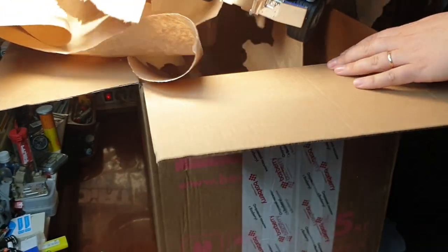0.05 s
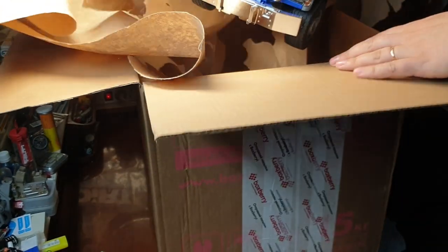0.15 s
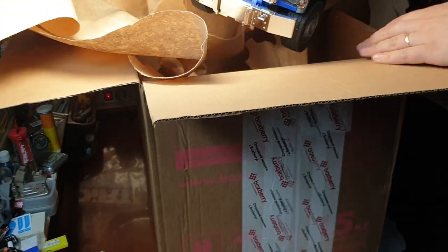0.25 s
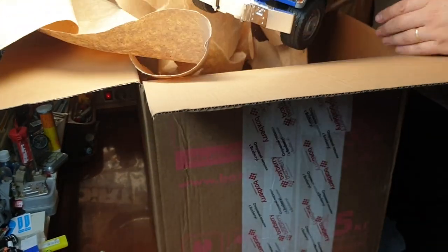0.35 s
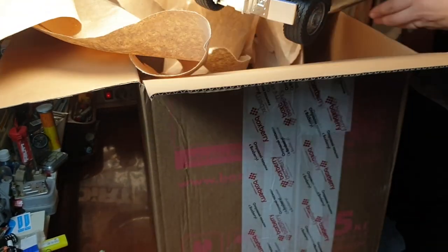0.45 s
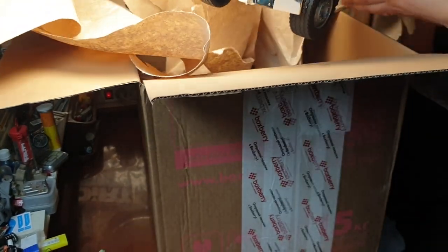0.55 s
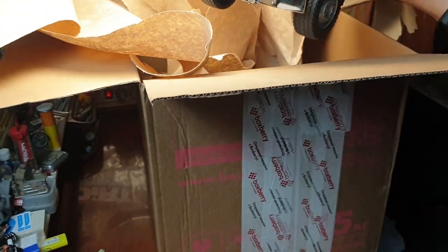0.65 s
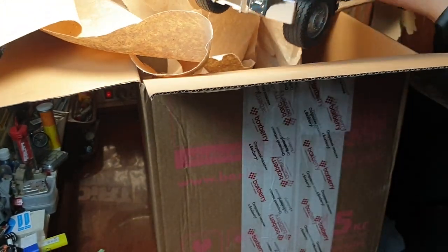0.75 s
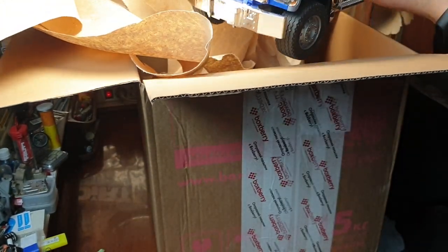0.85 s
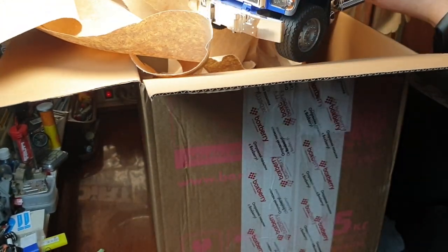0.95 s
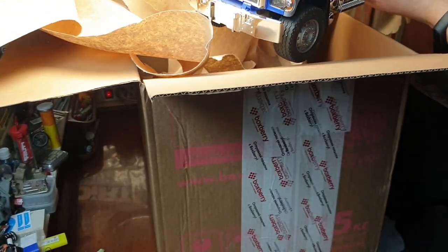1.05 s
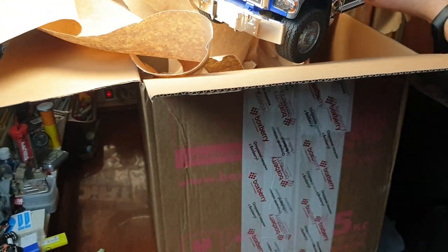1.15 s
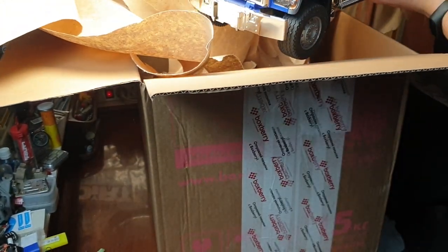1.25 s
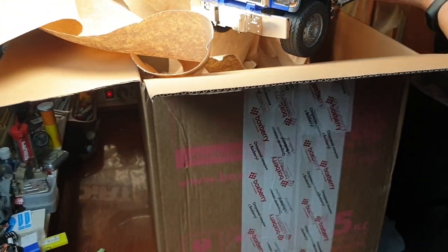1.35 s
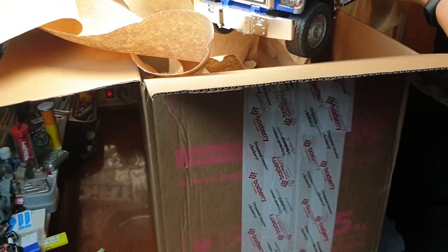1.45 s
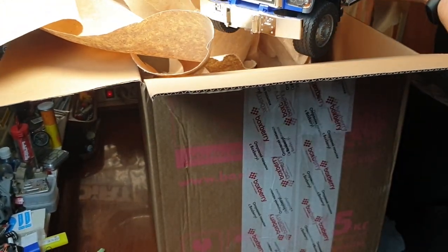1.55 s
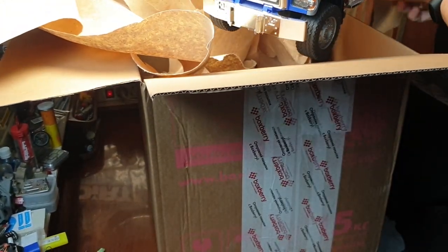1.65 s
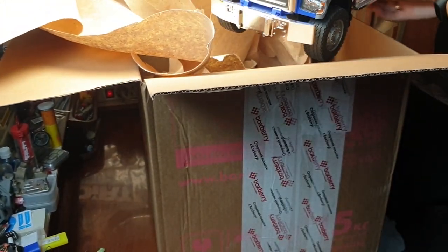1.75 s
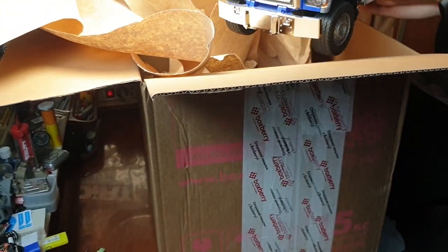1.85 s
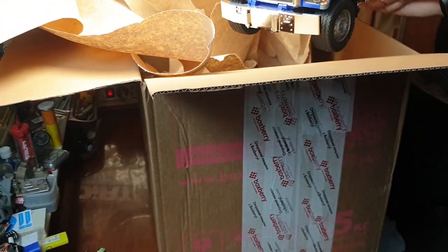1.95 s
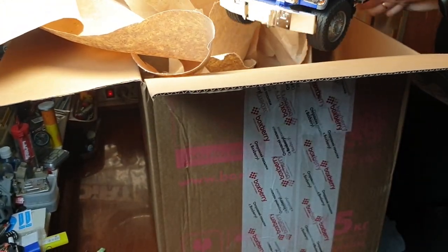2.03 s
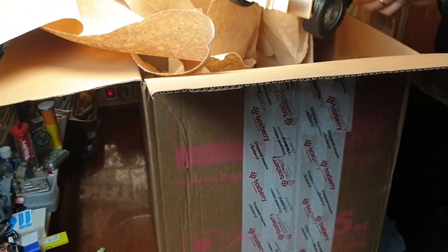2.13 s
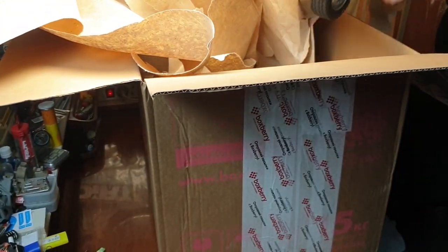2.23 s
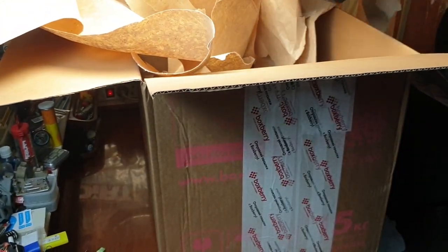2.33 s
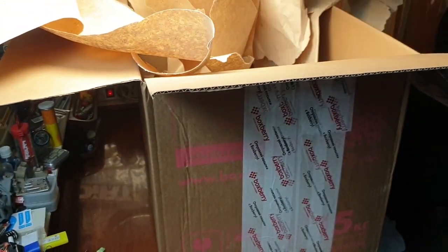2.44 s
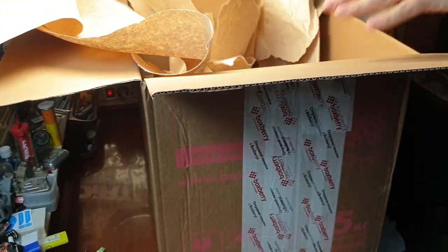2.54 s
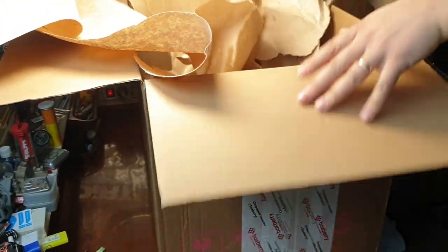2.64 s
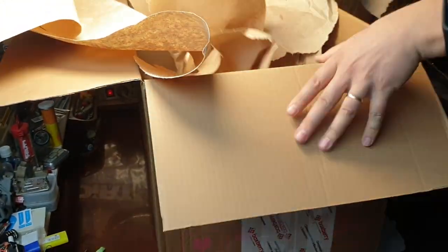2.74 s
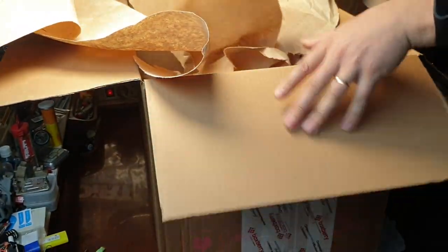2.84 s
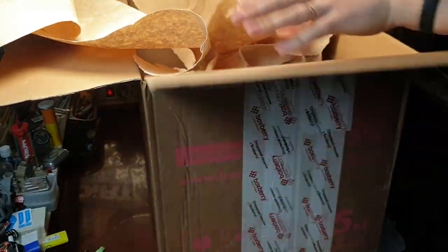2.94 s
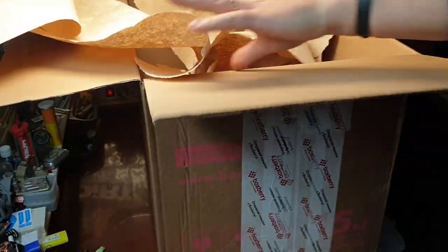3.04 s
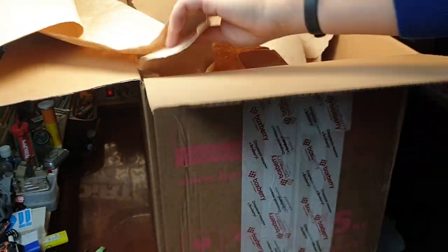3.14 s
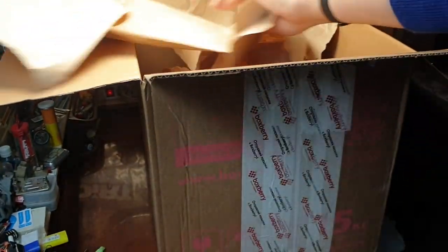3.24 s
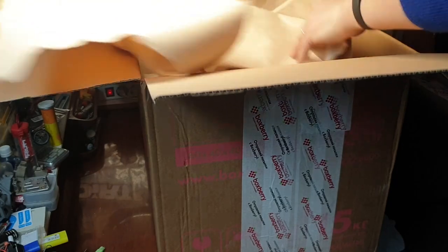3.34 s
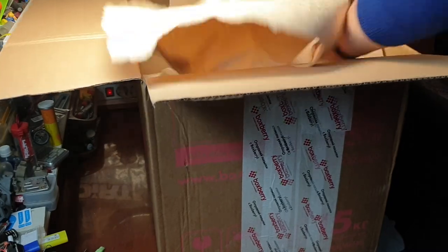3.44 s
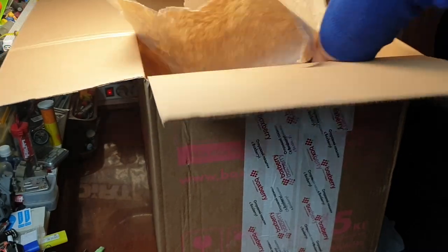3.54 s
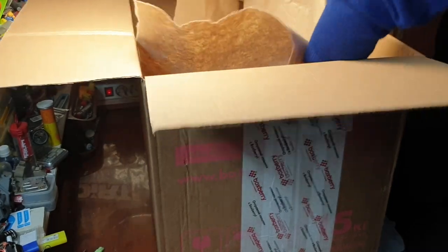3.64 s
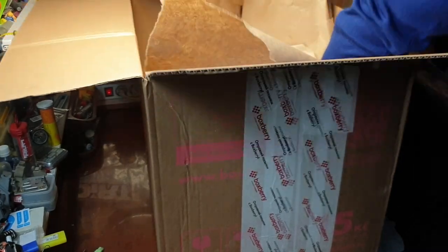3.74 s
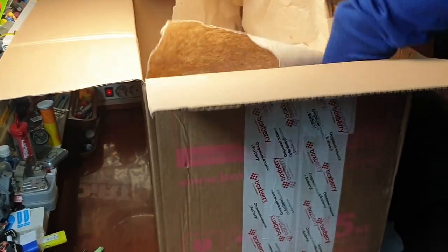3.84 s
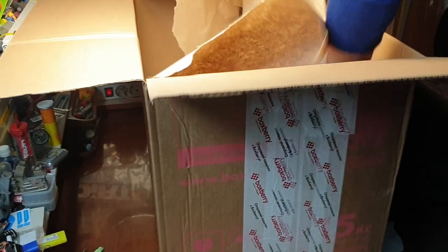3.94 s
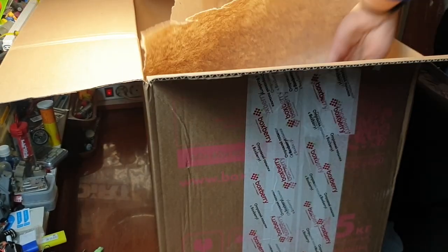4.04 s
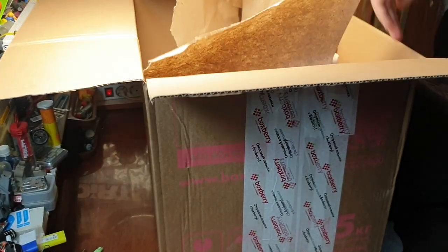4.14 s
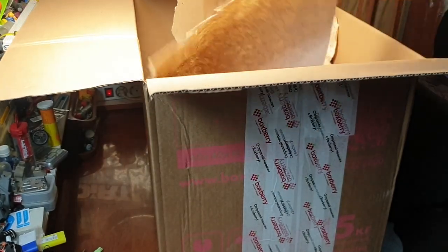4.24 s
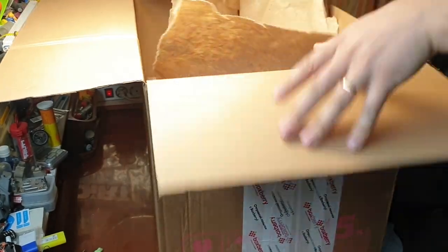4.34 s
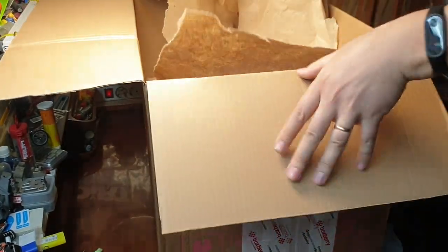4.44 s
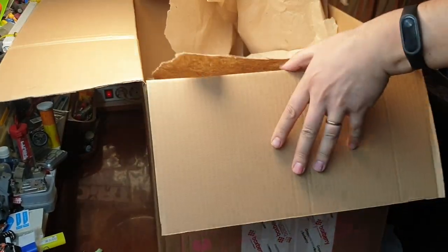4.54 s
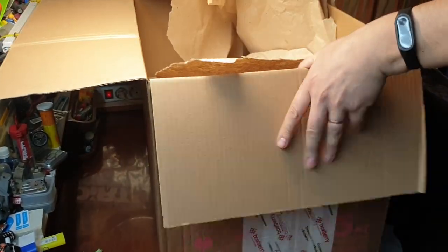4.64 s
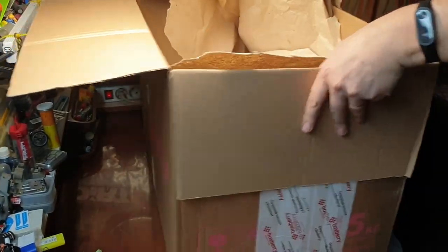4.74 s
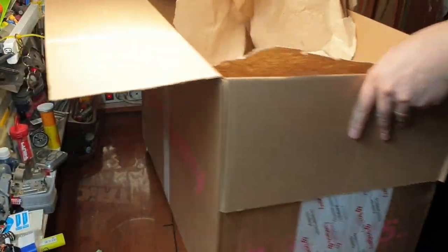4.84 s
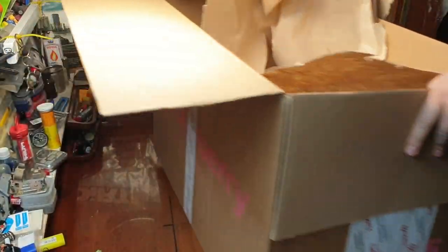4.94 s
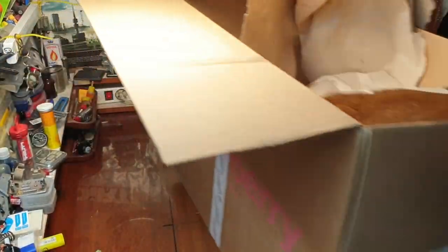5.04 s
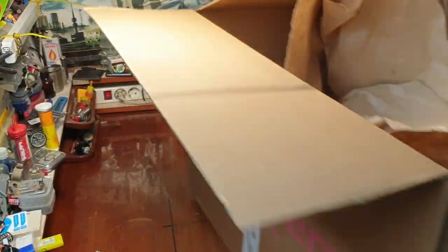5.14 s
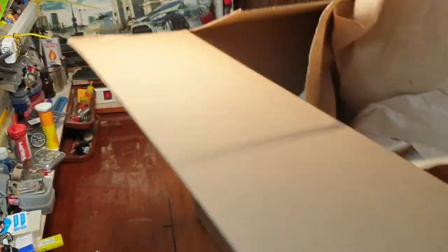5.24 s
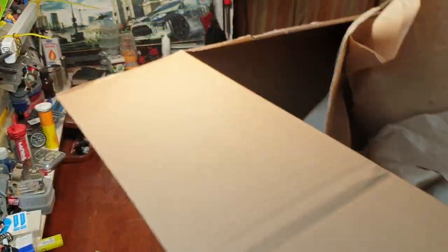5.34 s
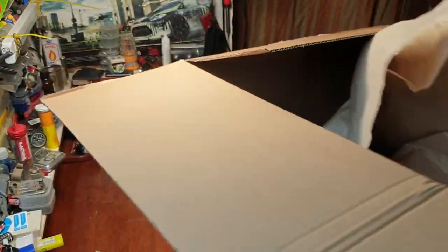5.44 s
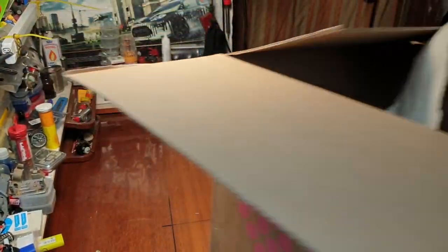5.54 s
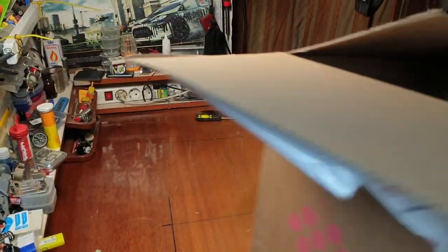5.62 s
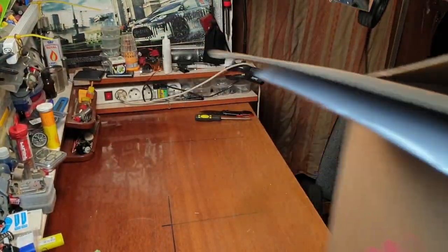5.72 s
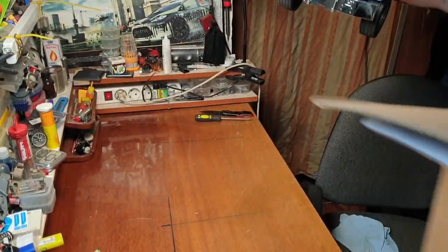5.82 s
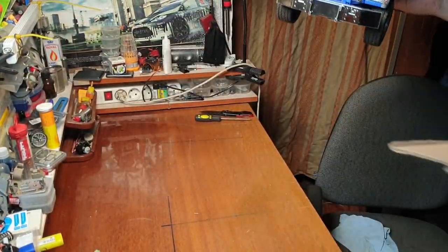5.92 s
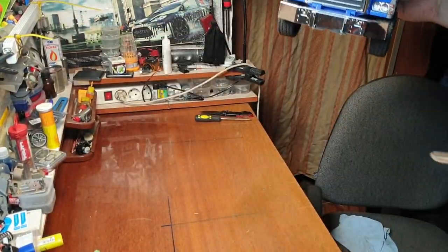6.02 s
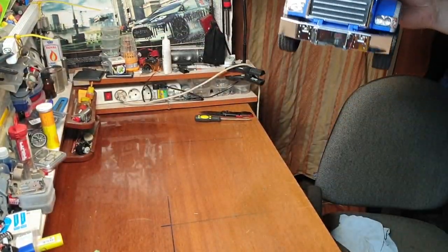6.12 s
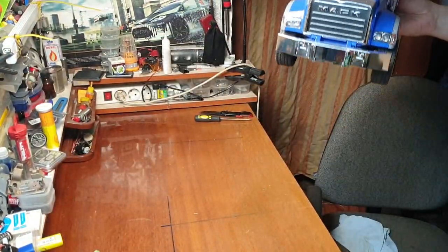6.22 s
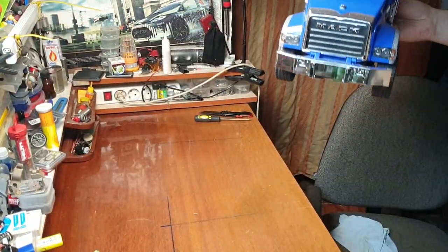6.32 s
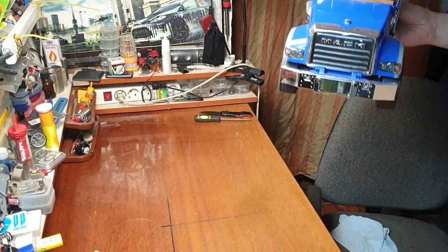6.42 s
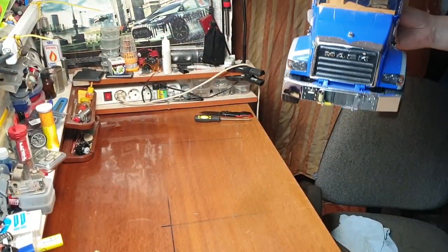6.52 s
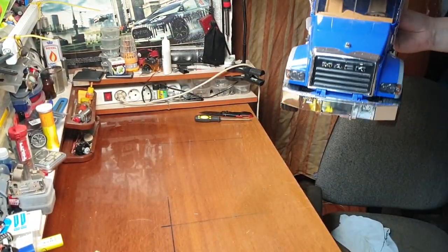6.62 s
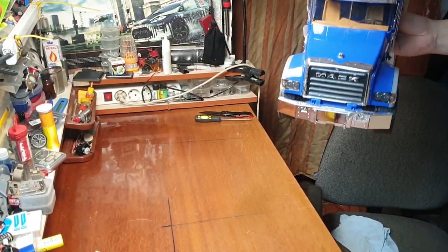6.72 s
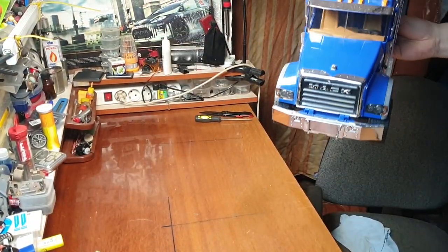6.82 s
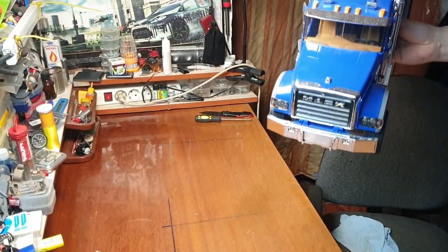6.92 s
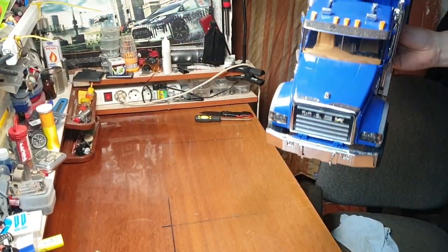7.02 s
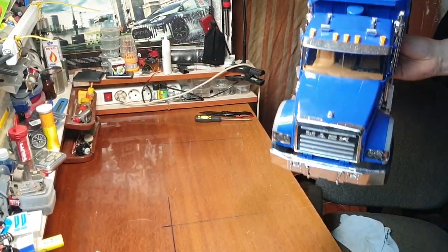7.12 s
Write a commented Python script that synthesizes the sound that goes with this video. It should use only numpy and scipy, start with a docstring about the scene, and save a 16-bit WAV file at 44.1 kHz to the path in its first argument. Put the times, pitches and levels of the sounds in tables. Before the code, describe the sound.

A close stereo microphone in a small, dry room with a very faint steady background. From 0 to 0.6 s stiff packing paper slides with crisp, moderate rustling and a few snaps. It thins to faint brushing from 0.7 to 2.2 s, with a soft low bump near 1.8. A sharp crackle at 2.4 and a hollow cardboard thump at 2.64 lead into the loudest passage, 3.0 to 3.6 s: dense bright crumpling and sharp snaps, with boxy knocks until 3.8. Shorter rustles follow, then a sharp flap knock at 4.35 and a brushing stroke at 4.7. From 4.9 to 6.1 s there are quieter scuffs, small knocks and dull low box movement, swinging briefly right around 5.75. After a lull, a low stick-slip judder stutters at 6.5-6.7, then again with a bump at 6.9, ending in light rustling at about 7.1.

```python
"""Kraft packing paper slides and crackles as a toy truck is lifted from a cardboard box in a small room.
The paper is stuffed back and the flaps are knocked and brushed; the box is then swung off the bench
to one side, where it judders as it is pushed along and bumps down. Paper is filtered showers of clicks,
knocks are pushes on damped box modes, scuffs are noise in gliding resonances, and the judder is a
train of stick-slip clicks; a short diffuse tail and steady noise give the room."""
import sys
import numpy as np
from scipy import signal
from scipy.fft import rfft, irfft, next_fast_len
from scipy.io import wavfile

SR = 44100
rng = np.random.default_rng(int(sys.argv[2]) if len(sys.argv) > 2 else 0)


def output_pcm(signal):
    """Save a mono or channel-first signal as 16-bit PCM at the path in sys.argv[1].

    Samples are clipped to [-1, 1] before scaling.
    """
    pcm = np.clip(np.atleast_2d(signal).T, -1, 1) * 32767
    wavfile.write(sys.argv[1], SR, np.round(pcm).astype(np.int16))


N = 316356
TIME = np.arange(N) / SR

# Damped normal modes of the box, air cavity and big wall first: f/Hz, relative level/dB, free t60/s
BOX_MODES = [(76.2, 1, 0.25), (134.4, 0, 0.21), (195, 1, 0.062), (253, -1, 0.14), (371.6, -9.5, 0.3),
             (409, -6.5, 0.1), (555, -23.5, 0.081), (567, -6.5, 0.05), (708, -0.5, 0.048), (730, 1, 0.071)]

# Interaural likeness of the friction sounds: f/Hz, share common to both ears (0 to 1)
EAR_LIKENESS = [(300, 1), (550, 0.86), (1000, 0.74), (2000, 0.3), (5000, 0.11), (15000, 0.095)]

# Strokes of hand, paper and card, each speeding up to a peak and slowing down:
# t/s at the peak, attack/s, release/s, crease level/dB, then levels relative to the creases:
# sheet body/dB, hiss/dB, box air/dB, box wall/dB
HAND_STROKES = [(0.023, 0.2, 0.4, -42, -1.7, -3.5, 2.5, -1),
                (0.231, 0.1, 0.27, -40.5, -2.5, -6.5, -12, -7.0),
                (0.397, 0.097, 0.052, -40.5, -14, 1.5, -12, -14),
                (0.5, 0.057, 0.13, -43.5, -2, -4, -3.5, -11.5),
                (0.888, 0.047, 0.11, -51.0, -0.2, -7, 2, -2), (1.105, 0.12, 0.16, -66, -4, -1.5, -13, -7),
                (1.547, 0.13, 0.052, -59, -6.5, -5, -6, -12),
                (1.868, 0.077, 0.15, -53.5, 3, -6.5, -1, -7.0),
                (2.156, 0.14, 0.078, -52.4, -4, -4.5, -17, -8.8),
                (2.271, 0.04, 0.083, -43.5, -6.5, -4, -8, -12),
                (2.42, 0.11, 0.11, -40.5, -3.5, -5.0, -7, -10),
                (2.651, 0.2, 0.19, -43.5, -0.7, -4.5, -13, -7),
                (2.743, 0.058, 0.053, -44, -4, 0.5, -3, -11),
                (2.805, 0.025, 0.031, -38, -5, -2.5, -10.3, -16.2),
                (2.892, 0.026, 0.032, -36, -10, -2, -21, -13), (3.057, 0.16, 0.059, -43.5, 0.5, -6, -7, -4),
                (3.108, 0.041, 0.013, -31, -14, -0.5, -8, -11.5),
                (3.18, 0.022, 0.12, -32.5, 0, -4.5, -19, -8.5),
                (3.298, 0.1, 0.35, -30.6, -18, -4, -17, -8.5), (3.416, 0.097, 0.27, -30, 1.5, -9, -6, -0.5),
                (3.634, 0.098, 0.072, -40.5, 2, 4.5, 3, -7.5),
                (3.777, 0.062, 0.097, -34.0, 4.5, -9.5, 1, -4.5),
                (3.941, 0.11, 0.083, -44, -1, -6.5, -2.0, -0.5),
                (4.068, 0.09, 0.061, -38.5, -4, -4, -14, -11), (4.26, 0.13, 0.12, -43, -5.5, -3.5, -3, -3),
                (4.407, 0.036, 0.047, -40.5, -5.5, -3.5, -4, -10),
                (4.509, 0.023, 0.05, -40, -12.5, -1.5, -2, -13),
                (4.628, 0.11, 0.3, -47.5, -2, -1, 4.5, -8.1),
                (4.717, 0.034, 0.043, -33.5, -7.5, -1.5, -15, -12),
                (4.946, 0.093, 0.12, -46.5, 1, -6, -2, -4), (5.102, 0.027, 0.21, -49, 0.5, -3, 0.4, -0.5),
                (5.324, 0.049, 0.094, -40.5, -4, -4, -14, -5),
                (5.421, 0.037, 0.073, -42, -2.5, -2.5, 2.5, -21),
                (5.609, 0.075, 0.053, -42.5, 1.4, -4, -5, -4),
                (5.748, 0.076, 0.26, -49.5, 0.5, -0.6, -6, 3), (5.87, 0.052, 0.22, -46.5, 0.5, 0.8, 2.5, 0),
                (6.051, 0.014, 0.098, -45.5, -1.9, -6, -19, -23),
                (6.442, 0.12, 0.019, -50.5, -1.2, -4.4, 1, -5),
                (6.545, 0.05, 0.091, -36.5, 1, -1.3, -9, -4),
                (6.617, 0.033, 0.019, -36.7, -1, -5, -5, -0.5), (6.688, 0.013, 0.12, -49.5, 1.3, -7, 5, -5),
                (6.941, 0.096, 0.084, -42, 1.2, -3.5, -2, -2.7), (7.005, 0.012, 0.11, -41, 0.8, -6, 2, -1)]


def from_db(db):
    """Amplitude gain is a power of ten of level over 20 dB."""
    return 10 ** (np.asarray(db) / 20)


def rms_one(x):
    """Normalise to unit mean power."""
    return x / np.sqrt(np.mean(x ** 2) + 1e-20)


def in_time(rows):
    """Linear interpolation gives each column of a time table at every sample."""
    s, *columns = np.transpose(rows)
    return [np.interp(TIME, s, column) for column in columns]


def at_hz(points, hz):
    """A spectrum is read by interpolation on a logarithmic frequency axis."""
    known_hz, values = np.transpose(points)
    return np.interp(np.log(hz), np.log(known_hz), values)


def drift(rate_hz):
    """Noise through a double real pole wanders slowly; computed at every 40th sample, rms 1."""
    pole = np.exp(-80 * np.pi * rate_hz / SR)
    noise = rng.standard_normal(N // 40 + 2002)
    slow = signal.lfilter([1], [1, -2 * pole, pole ** 2], noise)[2000:]  # settled part
    return np.interp(np.arange(N) / 40, np.arange(len(slow)), rms_one(slow))


def coloured(x, spectrum, low_hz=10, high_hz=SR):
    """Multiplication in the frequency domain shapes a signal between soft band edges; rms 1."""
    size = next_fast_len(N)
    hz = np.maximum(np.arange(size // 2 + 1) * SR / size, 1)
    edges = ((1 + (low_hz / hz) ** 8) * (1 + (hz / high_hz) ** 8)) ** -.5
    shaped = rfft(x, size) * edges * from_db(at_hz(spectrum, hz))
    return rms_one(irfft(shaped, size)[..., :N])


def panned(x, pan_db):
    """An interaural level difference, left minus right, places a sound to one side."""
    return x * from_db(np.array([[.5], [-.5]]) * pan_db)


def dying(t60):
    """Exponential decay: power falls by 60 dB in t60 seconds."""
    return 1e6 ** (-TIME[:SR // 2] / t60)


def stroke_power(s, attack, release):
    """The power envelope of one stroke rises to 1 at its peak and falls by a power law in dB."""
    fall_db, roundness = 9.5, 1.5  # lost over one attack or release; 1 = pointed peak, 2 = bell
    power = np.zeros(N)
    near = (TIME > s - 5 * attack) & (TIME < s + 5 * release)
    age = TIME[near] - s
    distance = abs(age / np.where(age < 0, attack, release))
    power[near] = from_db(-fall_db * distance ** roundness) ** 2
    return power


def ambience():
    """Stationary noise, uncorrelated at the two ears, forms the background."""
    # Background spectrum: f/Hz, relative level/dB
    background = [(18, -48), (30, -21), (95, 8), (220, -46), (662, -56), (2100, -97), (7390, -8),
                  (9110, -44), (15800, -44)]
    return from_db(-73) * coloured(rng.standard_normal((2, N)), background)


def room_tail(x, t60, low_hz):
    """Diffuse reverberation: dense dying echoes, different at each ear, weak in the bass."""
    age = TIME[:SR // 2]
    echoes = rng.standard_normal((2, len(age))) * 1000 ** (-age / t60)
    echoes *= age > .003  # the first echo comes after 3 ms
    echoes /= np.sqrt(np.sum(echoes ** 2, axis=1, keepdims=True))
    bass_cut = signal.butter(1, low_hz, "high", fs=SR, output="sos")
    return signal.fftconvolve(x, signal.sosfilt(bass_cut, echoes), axes=1)[:, :N]


def shudder():
    """Forced vibration: the hand strokes keep the air in the box and its walls trembling."""
    # Trembling of air and wall under a resting hand: level/dB of each
    resting_db = [-63.5, -79]
    # Spectrum of the trembling: f/Hz, spectral density level/dB
    tremble_colour = [(25, -14), (45, 1), (62, 1), (77, 13.5), (100, -2.5), (133, 2.5), (175, -6.5),
                      (245, -5), (330, -10)]
    linger_s = 0.017  # the heavy box swells and settles more slowly than the paper
    power = np.outer(from_db(resting_db) ** 2, np.ones(N))
    for s, attack, release, db, _, _, air, wall in HAND_STROKES:
        envelope = stroke_power(s, attack + linger_s, release + linger_s)
        power += np.outer(from_db([db + air, db + wall]) ** 2, envelope)
    # a weak part differs at the two ears
    rubbing = rng.standard_normal(N) + from_db(-12.5) * rng.standard_normal((2, N))
    cavity = coloured(rubbing, tremble_colour, high_hz=95.5)
    walls = from_db(-0.2) * coloured(rubbing, tremble_colour, low_hz=113.4, high_hz=306)
    return np.sum(np.sqrt(power)[:, None] * [cavity, walls], axis=0)


def judder(jitter, uneven_db):
    """Stick-slip friction: the pushed box lets go in a click train near the rate of its wall mode."""
    # Course of the stick-slip: t/s, mean slip rate/(1/s), level/dB
    slip_course = [(6.49, 135, -66), (6.535, 135, -29), (6.57, 135, -24.5), (6.62, 135, -31),
                   (6.66, 136, -28), (6.70, 140, -32), (6.76, 100, -54), (6.895, 145, -79),
                   (6.915, 168, -22.5), (6.95, 122, -22), (7.01, 136, -33), (7.08, 134, -63),
                   (7.12, 80, -63)]
    # Spectrum of the slips: f/Hz, relative level/dB
    slip_colour = [(70, -20), (135, 9.5), (270, -15), (400, -10), (540, -14), (750, -29), (1000, -38),
                   (1600, -50)]
    per_s, level_db = in_time(slip_course)
    turns = np.cumsum(per_s * (1 + jitter * drift(30))) / SR
    slips = np.diff(np.floor(turns), prepend=0)  # one click for each whole turn
    slips = slips * from_db(uneven_db * drift(80))
    moving = (TIME > slip_course[0][0]) * (TIME < slip_course[-1][0])
    return coloured(slips, slip_colour, low_hz=70) * from_db(level_db) * moving


def ring(force, hz, t60):
    """A damped resonator: a unit click sets a dying sine of initial height 1 ringing."""
    r, w = 1000 ** (-1 / (t60 * SR)), 2 * np.pi * hz / SR
    return signal.lfilter([0, np.sin(w)], [1, -2 * r * np.cos(w), r * r], force + 1e-18)


def box_modes(force):
    """Modal superposition: the response sums air cavity, big wall and upper modes in alternate sign."""
    return sum((-1) ** k * from_db(db) * ring(force, hz, t60)
               for k, (hz, db, t60) in enumerate(BOX_MODES))


def knocks(reach_octaves=0.61):
    """Impact excitation: a shorter push favours higher modes, and each blow sets its own damping."""
    # Blows on the box: t/s, air cavity level/dB, wall level/dB, upper-mode level/dB (each added to
    # the mode's own level), contact time/s, share of the free ring time
    blows = [(1.788, -25.5, -50, -60, 0.005, 1.46), (1.811, -26, -31.5, -44, .0035, 0.48),
             (2.386, -66, -45, -31.5, 0.0013, 1.66), (2.638, -22.5, -16.5, -22, 0.0018, 0.9),
             (2.746, -26, -50, -55, 0.008, 1.5), (3.009, -53, -23.5, -32.5, 0.0028, 0.67),
             (3.069, -43, -27, -50, 0.0029, 1.4), (3.554, -17, -37, -33, 0.0018, 2.1),
             (3.693, -19.5, -29, -39, 0.0026, .55), (3.752, -29, -44, -28.5, .002, 1.8),
             (3.795, -30, -39, -23.5, 0.0021, 0.82), (4.351, -26, -48, -24, 0.00042, 0.6),
             (4.356, -17, -13.5, -25, 0.0028, 0.66), (4.418, -26, -33, -45, .004, 0.57),
             (4.767, -34, -30.5, -28, .0025, .76), (5.002, -42, -37.5, -41, 0.0014, 1.6),
             (5.126, -29.5, -57, -55, 0.0094, 1), (5.319, -32.5, -35, -39, 0.0031, 1.4),
             (5.551, -39, -55, -35.5, 0.0018, 0.92), (5.576, -42, -23, -35, 0.003, .73),
             (5.750, -26.5, -35, -26, 0.0023, 0.48), (5.843, -53, -43, -38, 0.002, 1.1),
             (5.912, -51, -34, -47, 0.0025, .9), (6.404, -45, -37, -46, 0.0022, .87),
             (6.772, -30, -42, -58, 0.0042, 0.97), (6.824, -50, -44, -35, 0.0017, 1.4),
             (6.908, -47, -26, -16, 0.00068, 0.77), (6.945, -34, -25, -39, .0012, 1.2),
             (7.003, -48, -33, -36, .0012, 0.88)]
    out, age = np.zeros(N + SR), TIME[:SR // 2]
    hz, level_db, t60 = np.transpose(BOX_MODES)
    signs = (-1) ** np.arange(len(BOX_MODES))
    for s, cavity_db, wall_db, upper_db, contact, ring_share in blows:
        favoured_hz = 413 * (.001 / contact) ** 0.74  # 413 Hz for a 1 ms contact
        octaves_off = np.log2(hz / favoured_hz)
        drive = from_db(upper_db) * np.exp(-.5 * (octaves_off / reach_octaves) ** 2)
        drive[:2] = from_db([cavity_db, wall_db])
        decay = 1000 ** (-np.outer(1 / (t60 * ring_share), age))
        modes = np.sin(2 * np.pi * np.outer(hz, age)) * decay
        push = np.hanning(max(round(contact * SR), 4))
        response = signs * drive * from_db(level_db) @ modes
        blow = np.convolve(response, push / push.sum())
        at = round(s * SR)
        out[at:at + len(blow)] += blow
    return out[:N]


def scuffs():
    """Friction noise in one narrow resonance, whose pitch slides as the contact moves."""
    # Scuffs of card and plastic: t/s at the top, half length/s, level/dB, f/Hz at the top,
    # glide/(octaves per s), sharpness Q
    scuff_list = [(0.706, 0.0041, -40.5, 2670.0, 0.5, 11), (0.724, 0.0096, -49, 2680.0, -2.5, 13),
                  (1.548, 0.017, -60, 1244.0, -3.5, 7), (1.566, 0.02, -57, 740.0, -7.5, 5.4),
                  (1.876, 0.045, -50, 640.0, 0, 1.8), (2.137, 0.023, -54, 2950.0, 0.0, 7),
                  (2.18, 0.015, -48.5, 640, -15.5, 1.6), (2.276, 0.025, -42, 2910.0, 1.5, 3),
                  (2.295, 0.03, -49, 660.0, -3, 3), (2.389, 0.0067, -31.5, 1757, 0, 2),
                  (2.906, 0.021, -46.5, 1550.0, -1.5, 6.6), (3.351, 0.01, -25, 1100.0, -11, 2.1),
                  (3.496, 0.017, -27.5, 1055.0, -4, 2), (3.8, 0.035, -35.5, 620.0, 1, 10),
                  (4.024, 0.0041, -28.0, 1954.0, 1, 3), (4.279, 0.013, -42.5, 1604, -27.5, 2.4),
                  (4.3525, 0.0019, -20.5, 3280, -5, 2.9), (4.357, 0.0047, -31.5, 639, 0, 5.1),
                  (4.888, 0.018, -48.5, 1487.0, 4.5, 3.6), (4.89, 0.016, -47.5, 870.0, 2, 11),
                  (4.942, 0.009, -42.5, 1520.0, 0.5, 9.5), (5.734, 0.0046, -42, 9900, -2, 4.4),
                  (5.792, 0.013, -36, 445.0, 0, 10), (5.84, 0.012, -41, 300.0, -19, 1.9),
                  (5.937, 0.029, -38.5, 191.0, -5.5, 3.9), (6.039, 0.0035, -30.5, 5040.0, 2.5, 1.9),
                  (6.439, 0.0075, -37, 833.0, -0.5, 5), (6.554, 0.034, -43, 866.0, 2.0, 3.1),
                  (6.624, 0.013, -35, 878.0, 0.0, 2.2), (6.627, 0.011, -32, 400.0, -3, 3.7),
                  (6.914, 0.0067, -30.5, 784.0, -5, 4.2)]
    out = np.zeros((2, N))
    for s, half_length, db, hz, glide, sharpness in scuff_list:
        near = abs(TIME - s) < .12
        age = TIME[near] - s
        # complex noise: one common part, one for each ear
        white = rng.standard_normal((3, SR // 2, 2))[:, :len(age)] @ [1, 1j]
        alike = np.clip(at_hz(EAR_LIKENESS, hz), 0, 1)
        mixed = np.sqrt(alike) * white[0] + np.sqrt(1 - alike) * white[1:]
        half_band = signal.butter(2, hz / sharpness / 2, fs=SR, output="sos")
        wander = signal.sosfilt(half_band, mixed)
        # a gliding carrier lifts the narrow noise band to the resonance
        glide_age = np.clip(age, -2 * half_length, 2 * half_length)
        turns = np.cumsum(hz * 2 ** (glide * glide_age)) / SR
        rubbed = rms_one((wander * np.exp(2j * np.pi * turns)).real)
        out[:, near] += from_db(db) * np.exp(-.5 * (age / half_length) ** 2) * rubbed
    return out


def grains(edges, count, spread_db, patchy_db):
    """Granular friction: catching fibres give count uneven, partly correlated clicks a band; rms 1."""
    # Spectrum of the paper: f/Hz, spectral density level/dB
    paper_colour = [(280, -8.5), (340, -9), (420, -10), (520, -5.5), (650, -6.5), (820, -6), (1050, -9),
                    (1600, -10.5), (2600, -12), (4500, -13), (7200, -15.5), (9000, -25), (12000, -16),
                    (15500, -22)]
    out = np.zeros((2, N))
    for low, high in zip(edges, edges[1:]):
        hz, at = np.sqrt(low * high), rng.integers(0, N, count)
        alike = np.clip(at_hz(EAR_LIKENESS, hz), 0, 1)
        # as the sheet bends, its facets come and go in each band
        patches_db = patchy_db * drift(17.2)[at]
        sizes = from_db(spread_db * np.minimum(rng.exponential(1, count), 4) + patches_db)
        # every click faces the ears in its own way
        common = np.sqrt(alike) * rng.choice([-1, 1], count)
        facing = common + np.sqrt(1 - alike) * rng.standard_normal((2, count))
        clicks = np.array([np.bincount(at, sizes * ear, N) for ear in facing])
        facet = signal.butter(2, [low, high], "band", fs=SR, output="sos")
        out += from_db(at_hz(paper_colour, hz)) * signal.sosfilt(facet, rms_one(clicks) + 1e-18)
    return rms_one(out)


def crackle():
    """Random buckling: small creases give way in sudden jumps of power that die at once."""
    per_s, level_db, spread_db, t60 = 58, -3, 1.5, 0.013  # least level, relative to the stroke
    born = rng.random(N) < per_s / SR
    sizes = from_db(level_db + spread_db * np.minimum(rng.exponential(1, N), 3)) ** 2
    return np.maximum(signal.fftconvolve(born * sizes, dying(t60))[:N], 0)


def paper():
    """Amplitude modulation: strokes and snaps shape grains in hollow body, crisp creases and hiss."""
    # Paper settling between strokes: level/dB of body, creases, hiss
    settling_db = [-81, -87, -81]
    # Balance of the layers: gain/dB of body, creases, hiss
    balance_db = [-0.79, -0.15, 1.44]
    # Creases snapping through: t/s, crease level/dB, body level/dB and hiss level/dB relative
    # to the creases, t60/s
    snap_list = [(0.116, -32.5, -13, -13, 0.055), (0.167, -29, -8, -25, 0.046),
                 (0.293, -37.9, 2, -12.0, 0.046), (0.706, -42, -1.5, -8.7, 0.048),
                 (0.851, -47, -1, -13, 0.12), (0.858, -42, 3.5, -16, 0.08), (1.827, -46, 5, -12, 0.13),
                 (1.899, -43, -8, -9, 0.057), (2.38, -31.5, 2, -22, 0.066), (2.388, -34, 2.5, -21, 0.077),
                 (2.632, -38.5, 10, 2.5, 0.048), (3.033, -25, -21.0, -2.8, 0.072),
                 (3.147, -32, -8.9, -6, 0.25), (3.198, -21, -1, -17.0, 0.054), (3.224, -33, 10, -4, 0.024),
                 (3.264, -27.5, -16, -1, 0.129), (3.288, -26.5, 5, -18.0, 0.125),
                 (3.342, -23.5, 1.5, -17, 0.13), (3.412, -25, 0.4, -8, 0.15), (3.452, -30, -15, -18, 0.043),
                 (3.475, -27.3, -1, -15.1, 0.036), (3.516, -31, 12.5, -22.5, 0.043),
                 (3.741, -36, 6, -15.0, 0.029), (3.805, -26.5, -10.0, -16, 0.066),
                 (4.019, -28.5, -3.5, -15.7, 0.062), (4.276, -38.5, 3, -4.7, 0.047),
                 (4.351, -24.5, -4, -9, 0.053), (4.491, -44.5, -1.5, -9, 0.17), (5.749, -43, 10, -5, 0.03),
                 (5.844, -43.5, -15, 9.5, 0.073), (6.034, -35.5, -4, -4.3, 0.041),
                 (6.485, -38.2, 2, 2, 0.29)]
    crack_db, crack_t60 = -4, 0.0038  # first instant of a snap, relative to its longer decay
    power = np.outer(from_db(settling_db) ** 2, np.ones(N))
    for s, attack, release, db, body, hiss, _, _ in HAND_STROKES:
        power += np.outer(from_db([db + body, db, db + hiss]) ** 2, stroke_power(s, attack, release))
    # the crackles hardly reach the hiss
    uneven = 1 + np.outer(from_db([0, 0, -7]) ** 2, crackle())
    power *= uneven / uneven.mean(axis=1, keepdims=True) * from_db(drift(42)) ** 2
    for s, db, body, hiss, t60 in snap_list:
        at = round(s * SR)
        fall = (dying(t60) + from_db(crack_db) ** 2 * dying(crack_t60))[:N - at]
        power[:, at:at + len(fall)] += np.outer(from_db([db + body, db, db + hiss]) ** 2, fall)
    # band edges in Hz
    sheet = grains(np.geomspace(260, 1500, 9), count=5000, spread_db=2.5, patchy_db=2.5)
    creases = grains(np.geomspace(1500, 7500, 8), count=20000, spread_db=0.3, patchy_db=1.95)
    surface = grains(np.geomspace(7500, 16800, 5), count=60000, spread_db=0.2, patchy_db=1.5)
    layers = [sheet, creases, surface]
    return sum(from_db(db) * np.sqrt(p) * layer for db, p, layer in zip(balance_db, power, layers))


def scene():
    """Superposition: paper and box are placed by level and time differences, then the room is added."""
    # Place of paper and scuffs: t/s, left-right level/dB, lag of the left ear/ms (lag for all sources)
    place = [(0, 4, 0.019), (2.5, 4, 0.064), (4.9, 3.5, 0.067), (5.5, 2.0, 0.26), (6.0, 1.5, 0.36),
             (6.5, 2, 0.37), (7.17, 2.5, 0.33)]
    # Place of the box's own low sounds, passing close by the right ear as it is swung away:
    # t/s, left-right level/dB
    box_place = [(0, 4), (3.6, 3.5), (4.35, 3), (5.33, 3.3), (5.56, -3), (5.75, -12), (5.86, -3), (5.95, 3),
                 (6.5, 1.2), (7.17, 3)]
    pan_db, lag_ms = in_time(place)
    box_pan_db, = in_time(box_place)
    rustle = paper()
    # the paper drags on the card and sets the box ringing
    drag = from_db(-54) * rustle.mean(axis=0)
    box = box_modes(drag) + shudder() + judder(jitter=0.0236, uneven_db=-1.5) + knocks()
    left, right = panned(rustle + scuffs(), pan_db) + panned(box, box_pan_db)
    ears = np.array([np.interp(TIME - lag_ms / 1000, TIME, left), right])
    return ears + from_db(-10) * room_tail(ears, t60=0.18, low_hz=208) + ambience()


def record(dry):
    """Band limiting: the deepest bass is removed below about 36 Hz, and the top is cut steeply at 16 kHz."""
    bass_cut = signal.butter(3, 36, "high", fs=SR, output="sos")
    top_cut = signal.ellip(12, .1, 80, 16000, fs=SR, output="sos")
    return signal.sosfilt(top_cut, signal.sosfilt(bass_cut, dry))


dry = scene()
out = record(dry)
output_pcm(out)
```